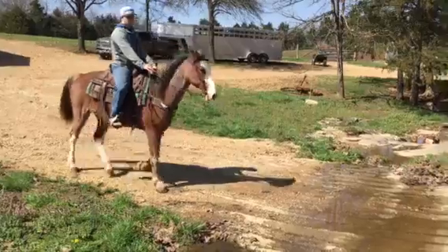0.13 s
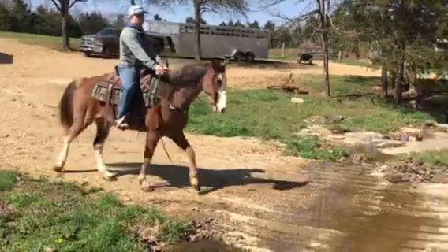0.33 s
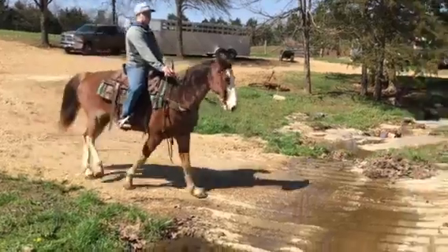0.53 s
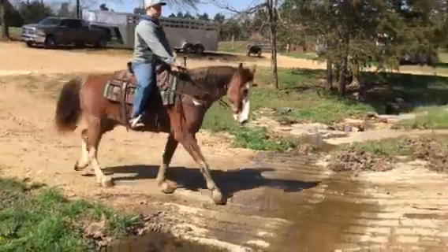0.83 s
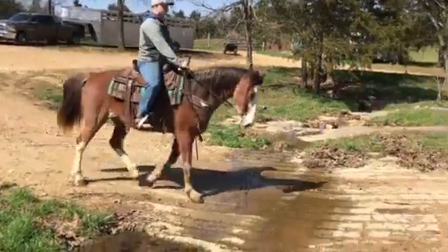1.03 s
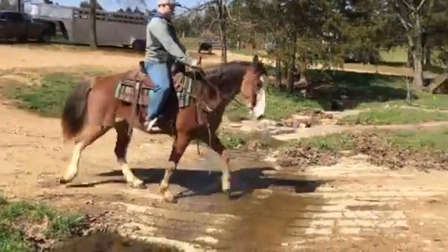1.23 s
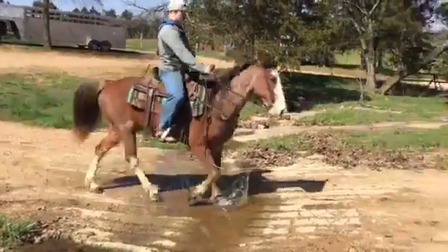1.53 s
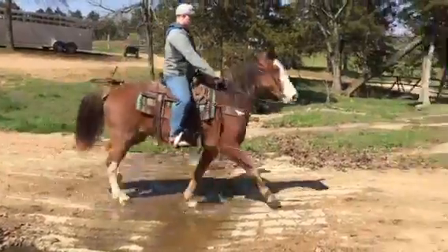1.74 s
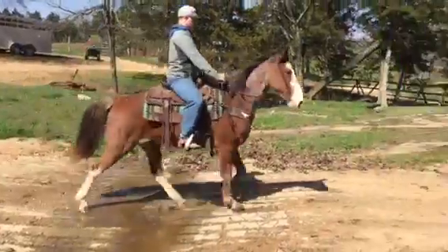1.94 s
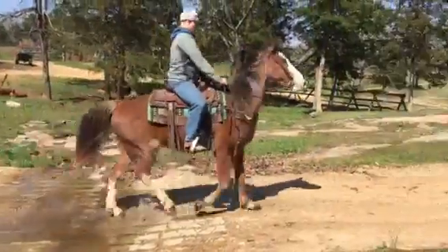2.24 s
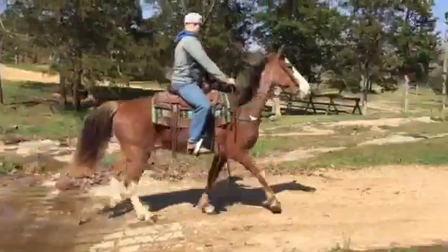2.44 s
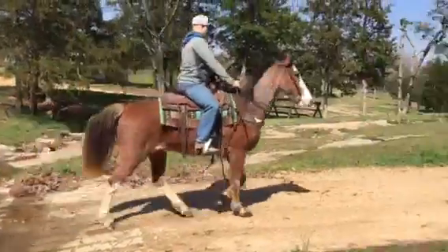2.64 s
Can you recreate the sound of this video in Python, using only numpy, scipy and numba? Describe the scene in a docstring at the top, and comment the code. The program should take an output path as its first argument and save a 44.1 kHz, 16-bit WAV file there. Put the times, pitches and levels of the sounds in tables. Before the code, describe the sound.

Horse hooves knock and scuff over gritty sand, then splash through a shallow puddle outdoors

```python
"""A horse walks over gravelly sand and on through a shallow puddle, a few metres from a phone outdoors.
Hooves knock as damped rings of hoof and ground, and scuff grit as shaped noise and swarms of tiny rings.
Puddle bubbles ring with a rising pitch over a patter of random clicks; a short ground echo follows.
Behind, a bird whistles gliding sines and a machine hums three wavering harmonics, under open-air noise."""
import sys
import numpy as np
from scipy import signal
from scipy.fft import rfft, irfft
from scipy.io import wavfile
from scipy.ndimage import uniform_filter1d
from numba import njit

SR = 44100
rng = np.random.default_rng(int(sys.argv[2]) if len(sys.argv) > 2 else 0)


def invert_db(level):
    """Linear amplitude ratio for a level in decibels (20 dB per decade), elementwise."""
    return 10 ** (np.asarray(level, dtype=float) / 20)


def dump_mix(stems):
    """Bounce the given channels to the path in sys.argv[1] as a 16-bit WAV at rate SR."""
    frames = np.atleast_2d(stems).T  # one column per channel
    limited = np.clip(frames, -1, 1)  # hard clip at full scale
    pcm = np.round(limited * 32767).astype(np.int16)
    wavfile.write(sys.argv[1], SR, pcm)


N = 123480

# hoof blows: (time [s], blow level before the mode levels [dB], ground thud relative to it [dB])
HOOF_BLOWS = [(0.615, -25, -19.5), (0.63, -19, -17.5), (0.6347, -26.5, -13.5), (0.877, -29, -20.5),
              (1.037, -23, -36), (1.047, -19, -28), (1.326, -23, -24), (1.805, -29, -6.5),
              (1.943, -21, -18.5), (2.12, -21, -13.5), (2.223, -33.5, -7.5)]
# ringing of the hoof: (mean frequency [Hz], relative level [dB], t60 [s])
HOOF_MODES = [(1000, 12, 0.0039)]
# ringing of the ground: (mean frequency [Hz], relative level [dB], t60 [s])
GROUND_MODES = [(204, 5.5, 0.05), (297, 11, 0.027), (413.4, 8.5, 0.021)]
# one deep footfall: (time [s], level [dB], frequency [Hz], t60 [s])
DEEP_FOOTFALL = (.151, -31, 68, .13)
# hoof drags and throws of grit or spray: (time [s], length [s], hiss level [dB], crunch relative to it [dB])
DRAGS = [(0.112, 0.078, -53, 3), (0.229, 0.0099, -44, -7), (0.234, 0.09, -67, 12.5), (0.379, 0.11, -48, 3),
         (0.627, 0.024, -60, 11), (0.685, 0.043, -46, -10), (.858, 0.014, -48, 1.5), (0.876, 0.016, -43, 1),
         (1.317, 0.0093, -43, -0.5), (1.333, 0.025, -41.5, -1.5), (1.518, 0.021, -33.5, -9),
         (1.549, 0.043, -40.5, -1), (1.609, 0.005, -38.5, 5.5), (1.737, 0.014, -49, 7.5),
         (1.776, 0.054, -47, 1), (1.802, 0.0086, -36, -1), (1.823, 0.049, -41.5, 6),
         (1.909, 0.03, -45, 2.5),  (1.936, 0.05, -47, 13), (2.103, 0.039, -36.5, 5.5),
         (2.216, 0.0098, -41.5, -3), (2.318, 0.05, -41.5, -0.5), (2.372, 0.0082, -28.5, -20),
         (2.48, 0.01, -39.5, 5), (2.655, 0.02, -41.5, -1), (2.687, 0.043, -39.5, -7)]
# single stones and drops ticking: (time [s], level before a 9.5 dB cut [dB])
STONE_TICKS = [(0.171, -29), (0.261, -35), (0.4514, -32), (0.4953, -34.5), (0.545, -41), (0.7734, -33),
               (0.9804, -37.5), (1.047, -32.5), (1.118, -38), (1.7232, -33), (1.8502, -24), (1.956, -17.5),
               (2.119, -29)]
# spectrum of wet grit and spray: (frequency [Hz], density [dB per Hz])
WET_HISS = [(1500, -4), (2500, -4.5), (3300, -5.5), (4600, -4.5), (6300, -1.5), (8000, -7), (14500, -9.5),
            (16500, -35)]
# spectrum of the noise within crunch and gurgle: (frequency [Hz], density [dB per Hz])
CRUNCH_NOISE = [(250, 0), (450, -2.5), (900, -13), (1570, 3), (3500, -15)]
# loose stones on the sand, then bubbles in the puddle: (time [s], level [dB], starting pitch [Hz])
BLIPS = [(.262, -44.5, 1000), (0.373, -32, 3820), (.695, -35.5, 1160), (.705, -36.5, 843),
         (0.707, -31.5, 1680), (0.722, -49.5, 556), (1.297, -32, 1790), (1.343, -30.5, 820),
         (1.374, -30, 1510), (1.443, -34.5, 1480), (1.491, -28.5, 1550), (1.521, -21, 1423),
         (1.747, -29, 900), (1.833, -33, 895), (1.855, -22, 1230), (1.9, -34.5, 590), (1.967, -28, 740),
         (2.001, -26, 1570), (2.127, -15.5, 1910), (2.335, -22.5, 2240), (2.515, -30, 1570),
         (2.632, -39, 1240), (2.76, -36, 1390)]
# stirred water: (time [s], patter level [dB], mean gurgle level relative to it [dB])
STIRRED_WATER = [(1.299, -61, -6), (1.7, -65.5, 7), (1.87, -56.5, 9.5), (2.01, -49, 3.5), (2.26, -55, 4.5),
                 (2.41, -45.5, -11), (2.52, -51.5, 11), (2.6, -52.5, -3.5), (2.8, -58, 1)]
# one bird phrase, a flat note that falls to a lower one: (time [s], pitch [Hz], relative level [dB])
BIRD_PHRASE = [(-.01, 2530, -9), (.012, 2530, 0), (0.047, 2520, -1), (.072, 1950, -14), (.125, 2000, -8)]
# machine drone: (time [s], mean pitch [Hz], mean level of the fundamental [dB])
MACHINE_HUM = [(1.8, 113.4, -52), (2.0, 110.3, -55)]
# spectrum of the open air: (frequency [Hz], density [dB per Hz])
AIR_SPECTRUM = [(36, -13.5), (65, -1.5), (85, -7), (125, -5), (250, -15), (340, -39.5), (1000, -34),
                (2500, -38), (3000, -42), (16500, -52)]

DRAG_ATTACK, DRAG_RELEASE = 0.12, 0.56  # shares of the drag's length
DRAG_TAIL_S, TICK_T60_S = 0.0091, 0.018
DRY_DB, DRY_ABOVE_HZ, WET_FROM_S = 5, 9000, 1.2  # dry sand is brighter; first step into the puddle
BLIP_CYCLES, BLIP_GLIDE = 27.2, 0.05  # length in cycles of the starting pitch; share by which pitch rises
PATTER_PER_S, GURGLES_PER_S, GURGLE_HZ = 2100, 500, 1793
ECHO_T60_S, ECHO_DB = 0.091, -10
BIRD_FROM_S, BIRD_EVERY_S, BIRD_PHRASES = 0.087, 0.195, 7
BIRD_DB, BIRD_SWELL_DB = -67.5, 1.3  # first phrase before its flutter; gain from one to the next
BIRD_ECHO_S, BIRD_ECHO_DB = 0.095, -8
OCTAVE_DB, TWELFTH_DB = -59, -76  # mean levels of the overtones
AIR_DB = -50  # before its flicker
BANDS = 8
START_S = 0.084


def knocks():
    """Every blow rings hoof and ground as damped modes, at slightly different pitches each time."""
    time, blow_db, thud_db = np.array(HOOF_BLOWS).T
    deep_time, deep_db, deep_hz, deep_t60 = np.array([DEEP_FOOTFALL]).T
    out = rings(deep_time, deep_hz, deep_t60, invert_db(deep_db), 0., 0.0021)
    bodies = ((HOOF_MODES, blow_db - 3, 0.0007), (GROUND_MODES, blow_db + thud_db, 0.001))
    for modes, body_db, rise_s in bodies:
        for hz, mode_db, t60 in modes:
            pitches = hz * (1 + 0.071 * rng.standard_normal(len(time)))
            decays = np.full(len(time), t60)
            out = out - rings(time, pitches, decays, invert_db(body_db + mode_db), 0., rise_s)
    return out


def stone_ticks(t):
    """Envelope of single stones and drops: a quick rise and an exponential decay."""
    out = np.zeros(N)
    for start, db in STONE_TICKS:
        decay = np.exp(-np.log(1000) * np.maximum(t - start, 0) / TICK_T60_S)
        out = out + invert_db(db - 9.5) * np.clip((t - start) / 0.0024, 0, 1) * decay
    return out


def scuffs(t):
    """Dragged grit hisses as grainy noise and crunches as a swarm of rings; single stones tick."""
    hiss, crunch = stone_ticks(t), np.zeros(N)
    for start, length, db, crunch_db in DRAGS:
        u = (t - start) / length
        attack = np.clip(u / DRAG_ATTACK, 0, 1)
        release = np.clip(1 - 1.59 * (u - DRAG_RELEASE), 0, 1)
        tail = np.exp(-np.maximum(t - start - length, 0) / DRAG_TAIL_S)
        env = attack * release * tail
        hiss = hiss + invert_db(db) * env
        crunch = crunch + invert_db(db + crunch_db) * env * np.clip(u / 0.4, 0, 1)  # crunch builds more slowly
    dry_hiss = [(hz, db + DRY_DB * (hz > DRY_ABOVE_HZ)) for hz, db in WET_HISS]
    dry_grit = level(colour(grains(3000, 7.9), dry_hiss), 0)
    wet_grit = level(colour(grains(3000, 7.9), WET_HISS), 0)
    grit = np.where(t < WET_FROM_S, dry_grit, wet_grit)
    return uniform_filter1d(hiss, size=150) * patchy(grit, 3.4, 70) + crunch * ring_swarm(450, 1320, 16.6)


def water(t):
    """Single blips ring; a swarm of small bubbles gurgles and falling drops patter as clicks."""
    start, blip_db, pitch = np.array(BLIPS).T.copy()
    blips = rings(start, pitch, BLIP_CYCLES / pitch, invert_db(blip_db), BLIP_GLIDE, 0.00047)
    time, water_db, relative_db = np.array(STIRRED_WATER).T
    patter_db = np.interp(t, time, water_db, -120)
    gurgle_db = patter_db + np.interp(t, time, relative_db)
    patter = patchy(level(colour(grains(PATTER_PER_S, 6.6), WET_HISS), 0), 3.83, 60)
    gurgle = ring_swarm(GURGLES_PER_S, GURGLE_HZ, 30.0) * invert_db(3.5 * walk(49.985))
    return blips + invert_db(patter_db) * patter + invert_db(gurgle_db) * gurgle


def ground_echo(near):
    """Convolve the near sounds with a short, exponentially decaying noise tail."""
    t = np.arange(N) / SR
    tail = rng.standard_normal(N) * np.exp(-np.log(1000) * t / ECHO_T60_S)
    return signal.fftconvolve(near, tail * invert_db(ECHO_DB) / np.sqrt(np.sum(tail ** 2)))[:N]


def bird(t):
    """A thin gliding sine repeats one phrase, each louder; the trees send it back once."""
    time, pitch, phrase_db = np.array(BIRD_PHRASE).T
    whistle = 0
    for k in range(BIRD_PHRASES):
        u = t - BIRD_FROM_S - k * BIRD_EVERY_S
        hz = np.interp(u, time, pitch)
        env = invert_db(BIRD_DB + k * BIRD_SWELL_DB + np.interp(u, time, phrase_db, -90, -90))
        tone = np.sin(2 * np.pi * np.cumsum(hz) / SR)
        whistle = whistle + np.sqrt(2) * uniform_filter1d(env, 200) * tone
    echo = invert_db(BIRD_ECHO_DB) * np.roll(whistle, int(BIRD_ECHO_S * SR))
    return (whistle + echo) * invert_db(1.8 * walk(40.4))


def hum(t):
    """A machine's low drone and two harmonics share a wavering pitch; their levels waver apart."""
    time, pitch, hum_db = np.array(MACHINE_HUM).T
    hz = np.interp(t, time, pitch) * (1 + 0.0141 * walk(16))
    phase = 2 * np.pi * np.cumsum(hz) / SR
    out = 0
    for harmonic, db in enumerate((np.interp(t, time, hum_db), OCTAVE_DB, TWELFTH_DB), 1):
        out = out + np.sqrt(2) * invert_db(db + 3.3 * walk(35.12)) * np.sin(harmonic * phase)
    return out


def open_air():
    """Coloured noise, heaviest in the bass, with slowly flickering bands."""
    return patchy(level(colour(rng.standard_normal(N), AIR_SPECTRUM), AIR_DB), 2.36, 7.4)


@njit
def rings(at, hz, t60, size, glide, rise):
    """Sum of damped sines, each with a soft onset and a pitch glide, cut off at its t60."""
    out = np.zeros(N)
    for k in range(len(at)):
        first, length, phase = int(at[k] * SR), t60[k] * SR, 0.
        for i in range(min(int(length), N - first)):
            phase += 2 * np.pi * hz[k] * (1 + glide * i / length) / SR
            decay = np.exp(-np.log(1000) * i / length)
            onset = 1 - np.exp(-i / (rise * SR))
            out[first + i] += size[k] * np.sin(phase) * decay * onset
    return out


def ring_swarm(per_s, centre_hz, cycles):
    """Randomly timed short rings, rising in pitch around a centre, over a little noise; rms 1."""
    c = rng.random((6000, 4))
    at = np.cumsum(-np.log(c[:, 0])) / per_s
    hz = centre_hz * np.exp(0.785 * (c[:, 1] + c[:, 2] - 1))
    size = invert_db(-2.4 * np.log(c[:, 3]))
    swarm = rings(at, hz, cycles / hz, size, 0.42, 0.00012)
    noise = level(colour(rng.standard_normal(N), CRUNCH_NOISE), -10.5)
    return level(level(swarm, 0) + noise, 0)


def grains(per_s, spread_db):
    """Random clicks of uneven size over fine noise, rms 1."""
    hit = rng.random(N) < per_s / SR
    click = hit * invert_db(spread_db * np.minimum(rng.exponential(size=N), 2.2))
    return level(rng.standard_normal(N) * (0.5 + click), 0)


def patchy(x, db, rate):
    """Half-octave bands above 2 kHz, and all below as one, flicker each on their own."""
    spec = rfft(x)
    place = np.maximum(2 * np.log2(np.arange(1, N // 2 + 2) * SR / N / 2000), 0)
    out = 0
    for k in range(BANDS):
        band = irfft(spec * np.clip(1 - abs(place - k), 0, 1), N)
        out = out + band * invert_db(db * walk(rate))
    return out


def walk(rate):
    """Random levels held 1 / rate seconds and smoothed twice; spread near 1."""
    k = int(SR / rate)
    steps = np.repeat(rng.standard_normal(N // k + 1), k)
    return 1.461 * uniform_filter1d(uniform_filter1d(steps, k), k)[:N]


def colour(x, points):
    """Filter by a (frequency [Hz], level [dB]) curve, interpolated over log frequency."""
    corner_hz, db = np.array(points).T
    hz = np.maximum(np.arange(N // 2 + 1) * SR / N, 1)
    return irfft(rfft(x) * invert_db(np.interp(np.log(hz), np.log(corner_hz), db, -70, -70)), N)


def level(x, db):
    """Scale to an rms level in dB."""
    return x * invert_db(db) / np.sqrt(np.mean(x ** 2))


def scene():
    """The near horse with a short ground echo, over bird, hum and open air."""
    t = np.arange(N) / SR
    near = knocks() + scuffs(t) + water(t)
    return (near + ground_echo(near) + bird(t) + hum(t) + open_air())[None]


def top_cut(x):
    """Nothing passes above the cut-off."""
    return signal.sosfilt(signal.butter(12, 16850, fs=SR, output="sos"), x)


def record(dry):
    """The sound sets in after a short silence."""
    mix = dry * (np.arange(N) > START_S * SR)
    return top_cut(mix)


dry = scene()
out = record(dry)
dump_mix(out)
```